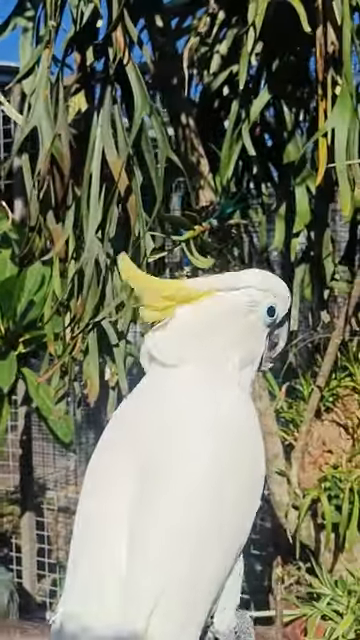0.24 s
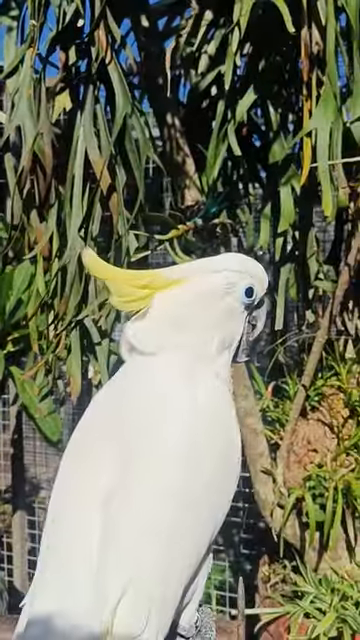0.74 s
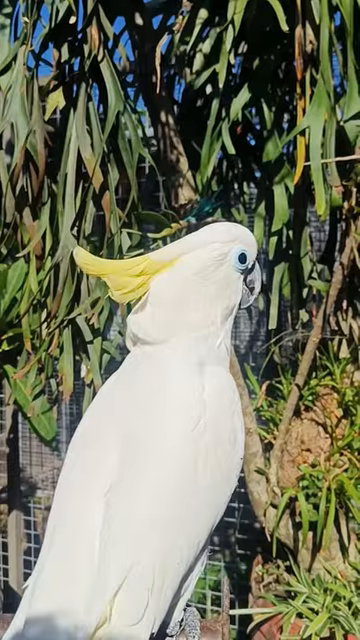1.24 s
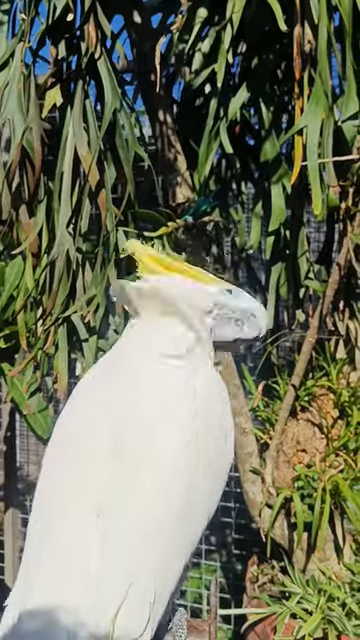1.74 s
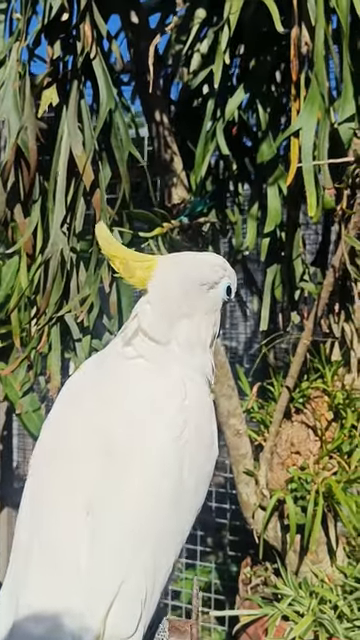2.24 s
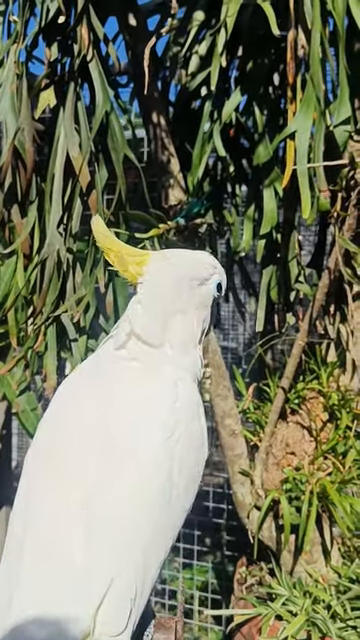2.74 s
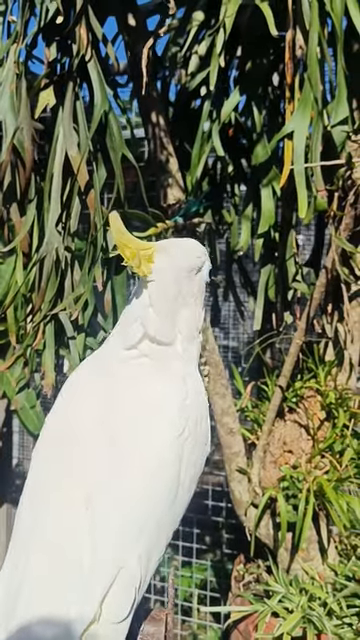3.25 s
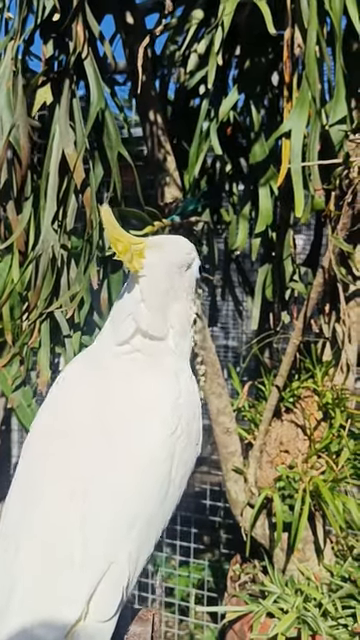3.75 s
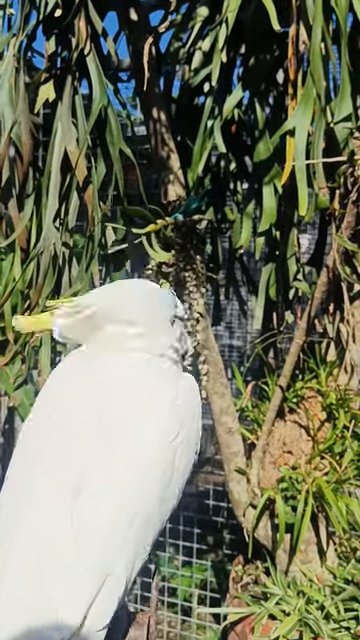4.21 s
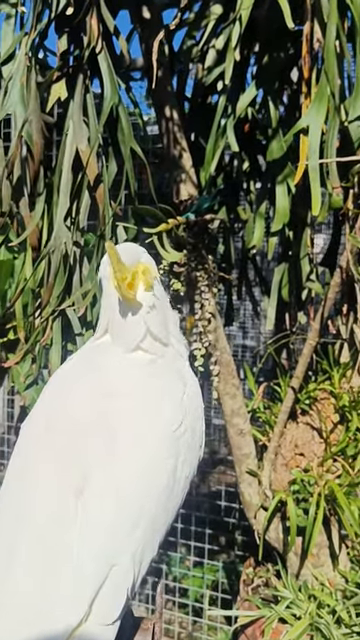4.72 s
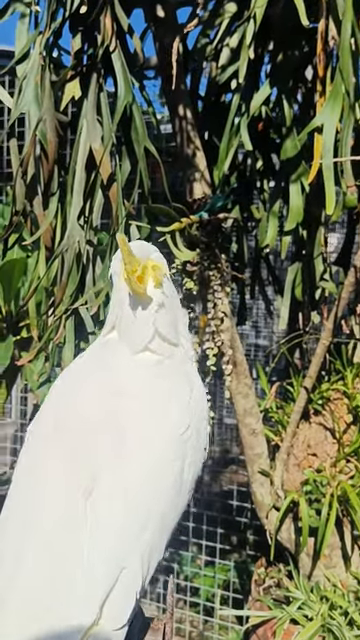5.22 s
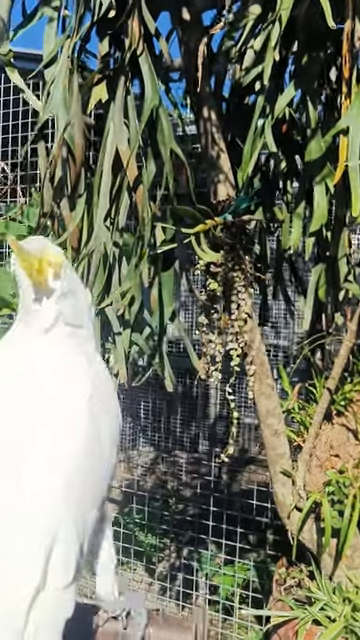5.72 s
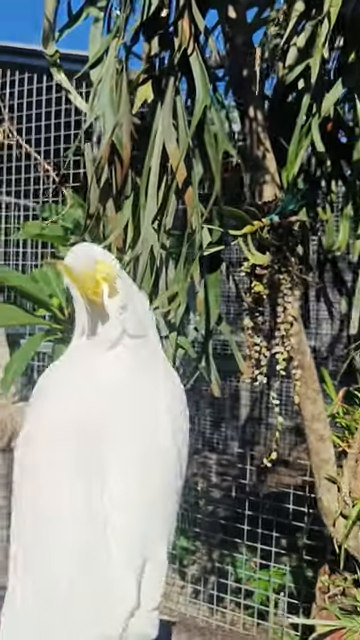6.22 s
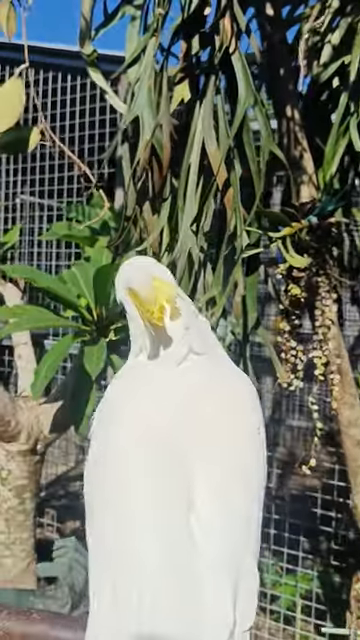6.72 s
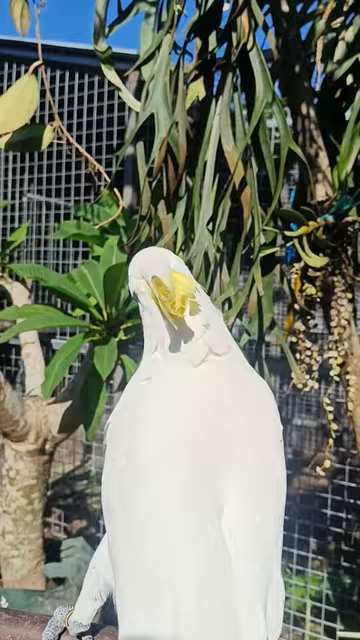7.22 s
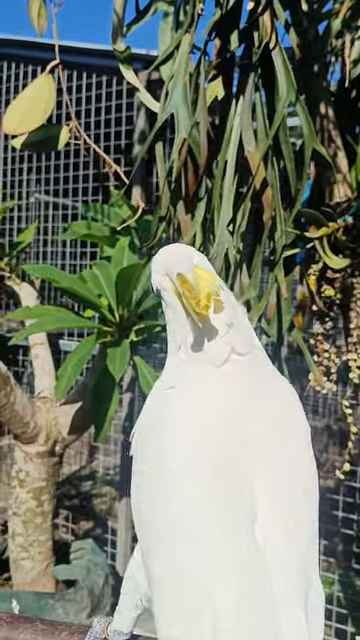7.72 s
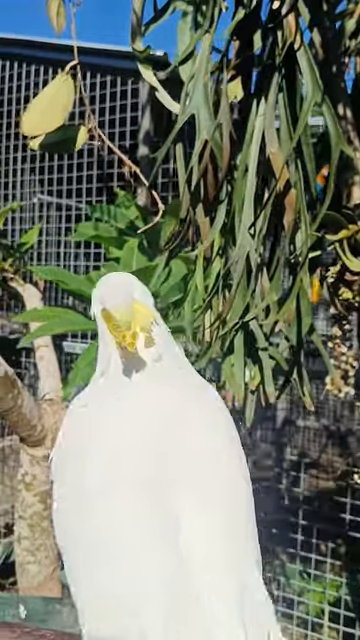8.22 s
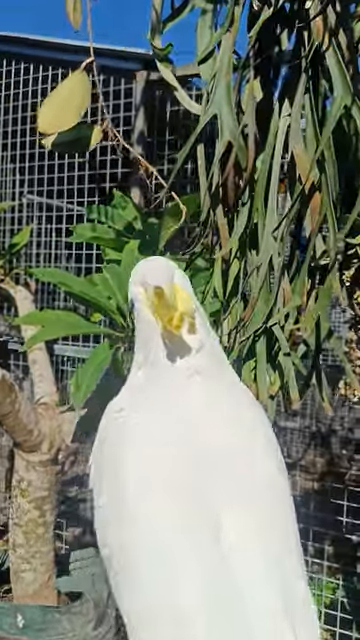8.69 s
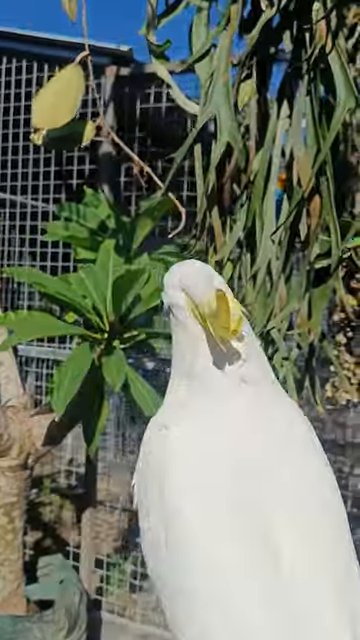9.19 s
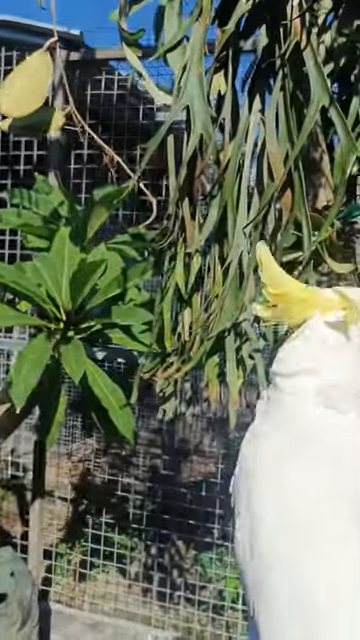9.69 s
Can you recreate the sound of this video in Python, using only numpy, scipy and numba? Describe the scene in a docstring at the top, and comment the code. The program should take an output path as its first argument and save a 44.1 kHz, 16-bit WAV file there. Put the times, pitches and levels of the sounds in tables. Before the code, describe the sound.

A cockatoo screeches close to the microphone about every two seconds, each call starting as a harsh rasp and settling on a clearer pitch. After the second screech, another parrot squawks twice nearby. Smaller parrots whistle and chatter further off. The outdoor aviary adds a short echo, and a light breeze rumbles on the microphone over a faint suburban hum.

```python
"""Cockatoo in an outdoor aviary

Close to a phone's two microphones a cockatoo screeches six times, each call chaotic at first, then
breaking and settling on a clear pitch. A second parrot squawks twice nearby; further off, smaller
parrots whistle and chatter among a few faint ticks. Walls and mesh answer.
Breeze drums on the microphones over a far suburban hum."""
import sys
import numpy as np
from scipy import signal
from scipy.fft import rfft, irfft, next_fast_len
from scipy.io import wavfile
from scipy.ndimage import uniform_filter1d, minimum_filter1d
from numba import njit

SR = 44100
rng = np.random.default_rng(int(sys.argv[2]) if len(sys.argv) > 2 else 0)


def store_pcm(level_fs):
    """Save levels as 16-bit WAV."""
    pcm = np.round(np.clip(level_fs, -1, 1) * 32767).astype(np.int16)
    wavfile.write(sys.argv[1], SR, np.atleast_2d(pcm).T)


N = 438794


def amp(db):
    """Gain of a level in dB."""
    return 10 ** (np.asarray(db) / 20)


def unit(x):
    """x at rms 1."""
    return x / np.sqrt(np.mean(x ** 2) + 1e-20)


def steady(x):
    """x with its slow level divided out."""
    return x / np.sqrt(np.abs(uniform_filter1d(x * x, size=4096)) + 1e-20)


def along(points, hz):
    """Values at hz between (Hz, value) points on a log axis."""
    point_hz, values = np.transpose(points)
    return np.interp(np.log(hz + 1), np.log(point_hz + 1), values)


def curves(rows):
    """One value per sample for each column after the time."""
    times, *columns = np.transpose(rows)
    return [np.interp(np.arange(N) / SR, times, column) for column in columns]


def gate(calls, edge_s):
    """1 inside each call, 0 between, with ramped edges."""
    t = np.arange(N) / SR
    return sum(np.clip(np.minimum(t - call[0][0], call[-1][0] - t) / edge_s, 0, 1) for call in calls)


def wobble(rate):
    """A random curve, rate knots a second."""
    knots = rng.standard_normal(int(N * rate / SR) + 2)
    return np.interp(np.arange(N) * rate / SR, np.arange(len(knots)), knots)


def filtered(x, response):
    """x through a complex response of frequency."""
    size = next_fast_len(N + SR // 2)
    return irfft(rfft(x, size) * response(np.fft.rfftfreq(size, 1 / SR)), size)[..., :N]


def modes(table, hz):
    """Causal response at hz of fixed resonances, alternating in sign."""
    return sum((-1) ** k * amp(db) * 1j * hz * width / (centre ** 2 - hz ** 2 + 1j * hz * width)
               for k, (centre, width, db) in enumerate(table))


@njit
def resonate(x, radius, cosine):
    """A two-pole band-pass whose centre moves sample by sample."""
    y = np.zeros(len(x))
    for i in range(2, len(x)):
        y[i] = x[i] - x[i - 2] + 2 * radius * cosine[i] * y[i - 1] - radius * radius * y[i - 2]
    return y


def band(x, hz, width_hz):
    """x through a moving resonance, twice for steep skirts, held at steady strength."""
    radius, cosine = np.exp(-np.pi * width_hz / SR), np.cos(2 * np.pi * hz / SR)
    return steady(resonate(resonate(x, radius, cosine), radius, cosine))


def add_at(track, start_s, sound):
    """Mix a stereo sound into the track."""
    track[:, round(start_s * SR):][:, :sound.shape[1]] += sound


def rush(spectrum):
    """Stereo noise of rms 1, alike at both microphones in the bass."""
    # Each row: frequency in Hz, left-right correlation.
    likeness = [(100, .994), (300, 0.9), (650, 0.68), (1400, 0.58), (3000, .02)]

    def mid_and_side(hz):
        angle = np.arccos(np.clip(along(likeness, hz), -1, 1)) / 2
        return amp(along(spectrum, hz)) * [np.cos(angle), np.sin(angle)]

    mid, side = filtered(rng.standard_normal((2, N)), mid_and_side)
    return unit(np.array([mid + side, mid - side]))


def suburb():
    """Far beyond the aviary, a broad hum and a low drone swell and fade."""
    # Each row: time in seconds, hum level in dB, drone level in dB.
    levels = [(0, -54, -58.5), (1.6, -67, -77.5), (2.49, -52, -60.5), (3.02, -61.5, -76.5),
              (3.69, -50, -61), (4.65, -50.5, -63), (5.32, -58.5, -64.5), (6.87, -58.5, -54),
              (7.23, -65.5, -67), (7.81, -53.5, -52.5), (8.5, -66, -61.5), (9.1, -61.5, -52.5),
              (9.64, -65, -69)]
    # Each row of both: frequency in Hz, relative noise density in dB.
    hum_spectrum = [(60, -18), (150, -8.5), (400, -9), (900, -16), (1800, -21), (2600, -29.5),
                    (8000, -58.5), (11000, -97)]
    drone_spectrum = [(60, -110), (120, -5.5), (131, -12), (142, -19), (170, -42), (400, -120)]
    hum_db, drone_db = curves(levels)
    hum = amp(hum_db + 3.5 + wobble(4.9)) * rush(hum_spectrum)
    drone = amp(drone_db - .5 + 4.9 * wobble(2.4)) * rush(drone_spectrum)
    return hum + drone


def breeze():
    """Gusts drum in the bass, right on the microphones."""
    # Each row: time in seconds, level in dB.
    gusts = [(0.0, -60), (0.11, -55), (1.77, -66.5), (1.94, -49.5), (3.32, -54.5), (3.38, -45), (3.93, -53),
             (4.13, -32), (4.82, -44), (5.99, -54), (6.04, -44.5), (6.65, -56), (6.73, -43.5),
             (7.01, -61.5), (8.12, -52), (8.59, -65), (9.95, -52)]
    # Each row: frequency in Hz, relative noise density in dB.
    drum_spectrum = [(20, -30.5), (45, -22), (62, -1), (80, -14.5), (110, -29.5), (300, -60), (1000, -120)]
    gust_db, = curves(gusts)
    return amp(gust_db + 1.3 * wobble(13)) * rush(drum_spectrum)


def aviary_echo(x, stretch):
    """Walls and mesh answer; each frequency dies at its own speed."""
    # Each row: frequency in Hz, seconds to fall 60 dB at a stretch of 1.
    decay = [(400, 0.25), (1060, 0.38), (2790, 0.35), (7350, 0.28)]
    hz, t, noise = signal.stft(rng.standard_normal((2, SR)), SR, nperseg=256)
    fade = amp(-60 * t / stretch / along(decay, hz)[:, None])
    _, tail = signal.istft(noise * fade, SR, nperseg=256)
    delayed = np.pad(x, ((0, 0), (200, 0)))
    return signal.fftconvolve(delayed, tail / np.linalg.norm(tail[0]), axes=1)[:, :N]


def faint_ticks():
    """Short, soft puffs of white noise."""
    # Each row: start in seconds, relative level in dB.
    puffs = [(4.3677, -25), (6.5253, -32), (7.6583, -24.5), (9.491, -48)]
    out, t = np.zeros((2, N + SR)), np.arange(SR // 20) / SR
    envelope = amp(-60 * t / .04) * (1 - np.exp(-t / .002))
    for start, db in puffs:
        add_at(out, start, amp(db - 11.5) * envelope * rng.standard_normal((2, len(t))))
    return out[:, :N]


def note(length, from_hz, to_hz, glide_s, second_db, third_db, rasp, swell=.68):
    """A small parrot's gliding tone; rasp shakes pitch and strength and adds breath."""
    t = np.arange(round(length * SR)) / SR
    noise = rng.standard_normal((3, SR // 5))
    shake = np.interp(t * 900, np.arange(SR // 5), noise[0])
    flutter = np.interp(t * 300, np.arange(SR // 5), noise[1])
    settled = 1 - np.exp(-t / glide_s)
    hz = (from_hz + (to_hz - from_hz) * settled) * (1 + .08 * rasp * shake)
    phase = 2 * np.pi * np.cumsum(hz) / SR
    overtones = amp(second_db) * np.sin(2 * phase) + amp(third_db) * np.sin(3 * phase)
    overtones += amp(third_db - 26) * np.sin(4 * phase) * (hz < SR / 9)
    tone = np.sin(phase) + settled ** 3 * overtones  # overtones bloom once the pitch settles
    breath = 4.9 * rasp ** 2 * np.std(tone) * uniform_filter1d(np.diff(noise[2]), size=3)[:len(t)]
    envelope = np.abs(np.sin(np.pi * (t / length) ** swell)) ** .5  # swell under 1 peaks early
    return envelope * amp(3.5 * rasp * flutter) * (tone + breath)


def whistling_parrots():
    """Far off, slightly left: a raspy scoop, a rise to a high note, a drop to a low one."""
    # Each row: start of the rise and of the drop in seconds, high note in Hz, level in dB.
    whistles = [(4.115, 4.201, 3372, -24), (4.368, 4.46, 3218, -21.5), (5.351, 5.431, 3393, -34),
                (5.592, 5.697, 3306, -33), (7.184, 7.272, 3400, -37), (7.41, 7.516, 3291, -28),
                (7.717, 7.822, 3300, -28)]
    low_hz, pan_db = 2805, np.array([[.8], [-.8]])
    out = np.zeros((2, N + SR))
    for start, drop, high_hz, db in whistles:
        rise = note(drop - start + .006, .76 * high_hz, high_hz, .011, -15, -17, rasp=.035, swell=1.6)
        fall = note(.075, high_hz, low_hz, .003, -20, -19, rasp=.16)
        scoop = note(.04, .7 * high_hz, high_hz, .018, -22, -26, rasp=.3)
        gain = amp(db + pan_db)
        add_at(out, start - .014, gain * amp(-10) * scoop)
        add_at(out, start, gain * rise)
        add_at(out, drop, gain * amp(-2) * fall)
    return out[:, :N]


def chattering_parrots():
    """Some way off to the right: runs of short chirps and longer single calls."""
    # Each row: start in seconds, first and target pitch in Hz, level in dB, overtones in dB, rasp 0-1.
    chirps = [(0.021, 2430, 2414, -42.5, -0.5, 0.5), (.064, 2503, 2413, -43, -4, .4),
              (0.098, 2512, 2468, -45.5, -2, 0.7), (.146, 2540, 2544, -45.5, 3.5, 0.5),
              (.179, 3323, 2970, -44.5, -5, 0.4), (.231, 4210, 3385, -48, 4, 0.4),
              (5.446, 2626, 2620, -41.5, 10.5, 0.5), (5.484, 2660, 2710, -45.5, 14, .2),
              (5.52, 2760, 2786, -41, 13.5, 0.2), (5.558, 2755, 2788, -42.5, 17, 0.3),
              (5.594, 2670, 2783, -38.5, 17, .12), (5.642, 4260, 2928, -26.5, 3.5, 0.3),
              (5.692, 4210, 3333, -29.5, 5, 0.4), (5.893, 2717, 2573, -41, 11.5, 0.6),
              (5.929, 4750, 4507, -22, -13, .3), (8.767, 2614, 2457, -40.5, 0, .5),
              (8.815, 2785, 2676, -41.5, 10, .4), (8.913, 2795, 2475, -46, 9, .6),
              (8.96, 2670, 2660, -45.5, 14.5, 0.5), (9.057, 2820, 2394, -46, 11.5, .6),
              (9.11, 2785, 2676, -49, 16, 0.5)]
    # Each row: start and length in seconds, first and target pitch in Hz, level in dB,
    # second and third partial in dB, rasp 0-1.
    single_calls = [(0.22, 0.11, 749, 840, -44, -1, -24, 0.4),
                    (.329, 0.069, 927, 791, -42.5, -0.5, -25, .3),
                    (1.969, .1, 1750, 1705, -43.5, -15.5, -21.5, 0.2),
                    (3.39, .19, 2650, 2690, -41, -13, -29.5, .1),
                    (3.369, 0.11, 1930, 2007, -45.5, -25.5, -1.5, 0.2),
                    (5.777, .13, 1717, 2232, -38, -3, -7.5, 0.3),
                    (5.825, 0.065, 3420, 3760, -29, -8.5, -17.5, 0.5),
                    (5.958, 0.036, 5030, 5710, -24.5, -18, -29.5, 0),
                    (7.652, .058, 634, 672, -48, -12, 8.5, .4), (9.2, .083, 1062, 1069, -54.5, -6, -7, 0.1)]
    chirp_s, glide_share, pan_db = .023, .21, np.array([[-1.5], [1.5]])
    out = np.zeros((2, N + SR))
    for start, from_hz, to_hz, db, over_db, rasp in chirps:
        chirp = note(chirp_s, from_hz, to_hz, glide_share * chirp_s,
                     over_db, over_db - 3, rasp, swell=.45)
        add_at(out, start, amp(db + pan_db) * chirp)
    for start, length, from_hz, to_hz, db, second_db, third_db, rasp in single_calls:
        call = note(length, from_hz, to_hz, glide_share * length, second_db, third_db, rasp)
        add_at(out, start, amp(db + pan_db) * call)
    return out[:, :N]


def microphones(x, left_lead_s):
    """A near voice reaches the left port first; the phone's body shades each port."""
    # Each row: frequency in Hz, level of left over right in dB.
    shading = [(400, 0), (1300, 3), (2400, -1.5), (4400, -3), (8100, -10), (15000, 4.5)]
    side = np.array([[.5], [-.5]])
    return filtered(np.array([x, x]),
                    lambda hz: amp(side * along(shading, hz))
                    * np.exp(2j * np.pi * hz * left_lead_s * side))


def syrinx(pitch_hz, rough, jitter, subharmonic):
    """Membrane pulses; roughness scatters their timing and trades them for cycle-gated noise."""
    rough = np.clip(rough, 0, 1)
    unsteady_hz = pitch_hz * (1 + .014 * wobble(45) + jitter * rough ** 2 * wobble(400))
    phase = 2 * np.pi * np.cumsum(unsteady_hz) / SR
    pulses = unit((1 - .81) / (1.81 - 1.8 * np.cos(phase)) - 1)  # each partial is .9 of the one below
    pulses *= 1 + subharmonic * np.cos(phase / 2)  # strong and weak cycles alternate
    hiss = unit(rng.standard_normal(N) * (1 + .8 * np.cos(phase)))
    return (np.sqrt(1 - rough) * pulses + np.sqrt(rough) * hiss) * amp(2.2 * rough * wobble(70))


def squawk(start, peak, end, db, first_hz, top_hz):
    """Turning points (seconds, level in dB, pitch in Hz) of a squawk; pitch climbs with effort."""
    return [(start, db - 32.5, first_hz),
            (start + .4 * (peak - start), db - 10.5, first_hz + .6 * (top_hz - first_hz)),  # opens fast
            (peak, db, top_hz),  # after a slower swell
            (end, db - 17, .93 * top_hz)]


def second_parrot():
    """Nearby, a higher, rough voice whose mouth resonance follows the pitch."""
    # Each row: start, peak and end in seconds, level in dB, first and top pitch in Hz.
    squawks = [(3.421, 3.77, 3.82, -11, 521.8, 904.4), (3.854, 4.047, 4.09, -11, 532.8, 850.3)]
    # Each row: centre and width of a resonance in Hz, relative gain in dB.
    treble_modes = [(2358, 210, -7), (4020, 420, -2.5), (4630, 320, 3.5), (6300, 3900, -10.5),
                    (8590, 360, -3), (13400, 1000, -34.5)]
    calls = [squawk(*row) for row in squawks]
    db, pitch_hz = curves(sum(calls, []))
    source = syrinx(pitch_hz * (1 + .045 * wobble(22)), rough=.6, jitter=.14, subharmonic=.8)
    mouth = band(source, 1.82 * pitch_hz, width_hz=1100)
    fundamental = band(source, pitch_hz, width_hz=200)
    treble = steady(filtered(source, lambda hz: modes(treble_modes, hz)))
    voice = mouth + .1 * fundamental + amp(-10) * treble
    return gate(calls, edge_s=.0041) * amp(db + 1.8 * wobble(70)) * voice


def screech(start, catch, full, snap, clearest, end, db, crest_hz, first_hz, note_hz, rough):
    """Turning points (seconds, level in dB, windpipe in Hz, pitch in Hz, roughness) of a screech."""
    chaos, settling, husky, fraying = .89, .6, .4, .55  # roughness, stage by stage
    note_db, accent_db = db - 2.5, db + 2
    rest_hz = 3 * note_hz  # after the break the windpipe rests on the third partial
    return [(start, db - 25, .9 * crest_hz, note_hz, chaos),  # a quiet lead-in
            (catch, db - 25, .9 * crest_hz, note_hz, chaos),
            (catch + .003, db - 15.5, .9 * crest_hz, note_hz, chaos),  # the voice catches with a jump
            (full, db, .95 * crest_hz, note_hz, chaos),
            (full + .4 * (snap - full), db, crest_hz, note_hz, chaos),
            (full + .8 * (snap - full), db, .89 * crest_hz, note_hz, chaos),
            (snap, db + 4.5, 1158, .91 * note_hz, chaos),  # the break: windpipe dips, voice surges
            (snap + .05, db, 3 * first_hz, first_hz, settling),
            (clearest - .03, note_db, rest_hz, (first_hz + note_hz) / 2, husky),
            (clearest, note_db, rest_hz, note_hz, rough),
            (end - .036, note_db, rest_hz, note_hz, rough),
            (end - .018, accent_db, rest_hz, note_hz, fraying),
            (end, accent_db, rest_hz, note_hz, fraying)]


def cockatoo():
    """Close by, the syrinx sounds through windpipe, beak, chest and head resonances."""
    # Each row: start, catch, full voice, break, clearest moment and end in seconds, level in dB,
    # windpipe crest in Hz, first and last pitch of the closing note in Hz, its roughness 0-1.
    screeches = [(.422, .457, .48, .83, 1.03, 1.08, -12, 1590, 466, 488, .2),
                 (2.235, 2.262, 2.31, 2.62, 2.82, 2.905, -12.5, 1580, 466, 468, .07),
                 (4.635, 4.661, 4.72, 5.06, 5.23, 5.335, -13, 1430, 455, 461, .05),
                 (6.604, 6.648, 6.67, 6.975, 7.18, 7.225, -12, 1530, 465, 492, .15),
                 (8.124, 8.143, 8.2, 8.46, 8.66, 8.72, -11, 1620, 482, 494, .4),
                 (9.842, 9.866, 9.905, 10.25, 10.45, 10.5, -14, 1500, 470, 480, .2)]
    # Each row: centre and width of a resonance in Hz, relative gain in dB.
    head_modes = [(3244, 307, 3), (4130, 1900, -7.5), (5172, 540, -1.5), (7160, 570, -7.5),
                  (8860, 980, -14), (12880, 2100, -26)]
    calls = [screech(*row) for row in screeches]
    db, pipe_hz, pitch_hz, rough = curves(sum(calls, []))
    clear = np.clip(1 - rough, 0, 1)
    source = syrinx(pitch_hz, rough, jitter=.12, subharmonic=.34)
    beak_hz = 2200 + 160 * clear + 60 * wobble(14)
    windpipe = band(source, pipe_hz, width_hz=90) * amp(-.5 - 9.5 * clear + 3 * wobble(40))
    beak = band(source, beak_hz, width_hz=276) * amp(3.8 * wobble(30))
    between = band(source, (pipe_hz + beak_hz) / 2, width_hz=420)
    chest = band(source, 450 + 400 * rough, width_hz=280)
    chest += 2 * band(source, np.full(N, 940.), width_hz=280)
    breathy = syrinx(pitch_hz, .05 + .88 * rough, jitter=.12, subharmonic=.2)  # ragged high partials
    head = steady(filtered(breathy, lambda hz: modes(head_modes, hz) * hz ** 2 / (hz ** 2 + 2500 ** 2)))
    # a regular swing brings out the lowest partials and more treble
    chest *= amp(-33.5 + 16.2 * clear)
    head *= amp(-16 + 12.2 * clear + 2.3 * wobble(25))
    # a roving resonance gives the rasp its edge
    bite = band(breathy, 3450 + 170 * wobble(4), width_hz=260) * amp(-21.5 + 6.8 * wobble(12))
    voice = .8 * windpipe + .76 * beak + .56 * between + chest + head + bite
    return gate(calls, edge_s=.00063) * amp(db - 1 + .91 * rough * wobble(80)) * voice


def scene():
    """At the phone the near voices are mostly direct, the smaller parrots mostly echo."""
    near = microphones(cockatoo() + second_parrot(), left_lead_s=56e-6)
    whistles, chatter, ticks = whistling_parrots(), chattering_parrots(), faint_ticks()
    direct = near + amp(-.5) * whistles + amp(1) * chatter + ticks
    echo = aviary_echo(amp(-4.5) * near + amp(-8) * ticks + amp(4) * chatter, stretch=.98)
    far_echo = aviary_echo(amp(4.5) * whistles, stretch=1.29)  # sound from far off rings longer
    return direct + echo + far_echo + suburb() + breeze()


def record(dry):
    """The phone's quick limiter ducks any peak over its ceiling; the highest treble is cut off."""
    ceiling, window, top_hz = .95, round(.003 * SR), 15700
    needed_gain = ceiling / np.maximum(np.abs(dry).max(axis=0), ceiling)
    gain = uniform_filter1d(minimum_filter1d(needed_gain, size=window), size=window)
    return filtered(dry * gain, lambda hz: hz < top_hz)


dry = scene()
out = record(dry)
store_pcm(out)
```